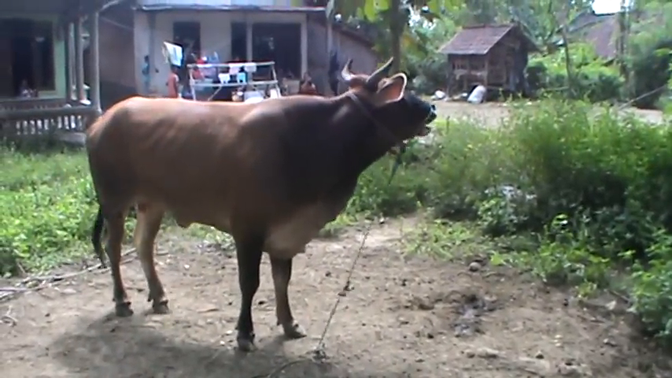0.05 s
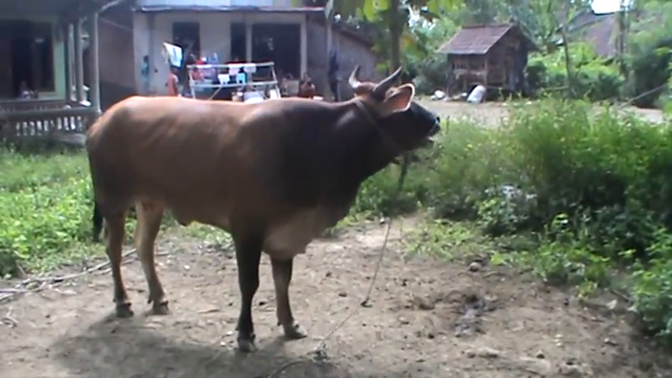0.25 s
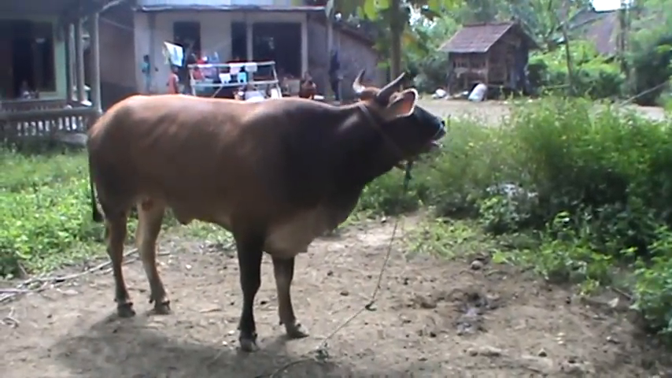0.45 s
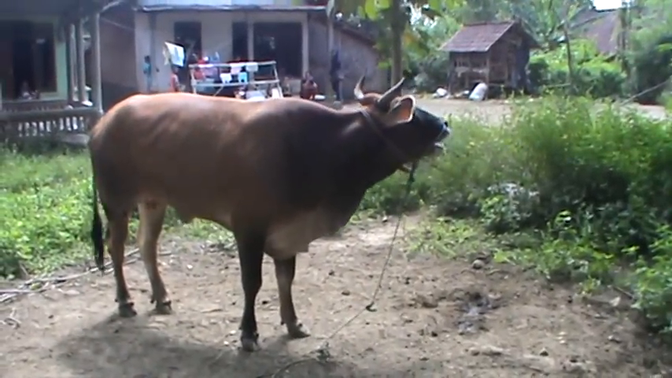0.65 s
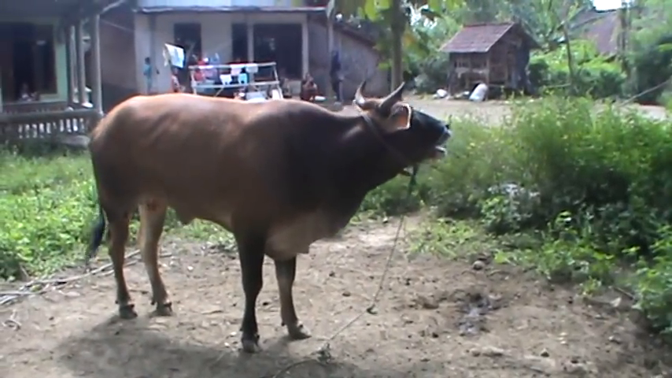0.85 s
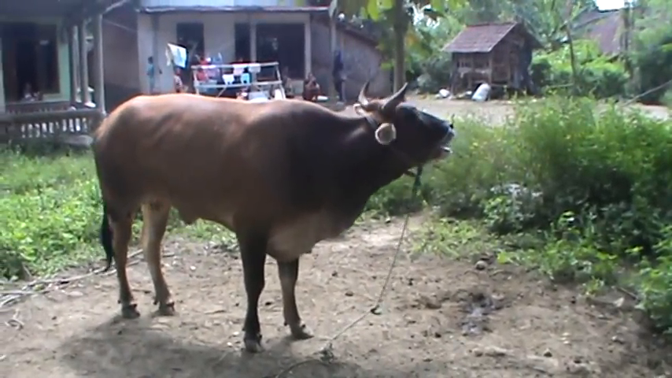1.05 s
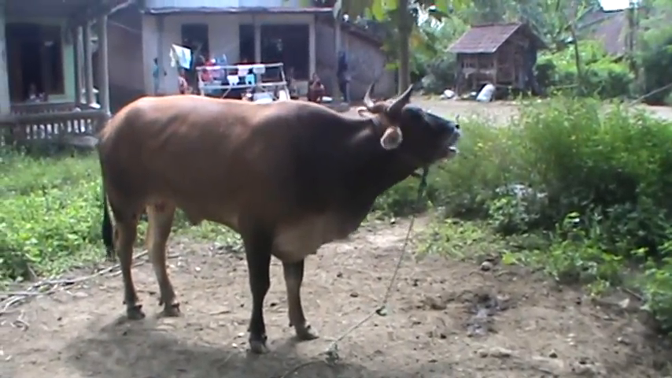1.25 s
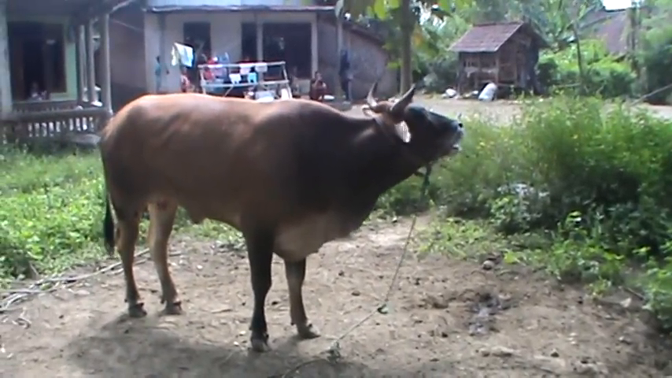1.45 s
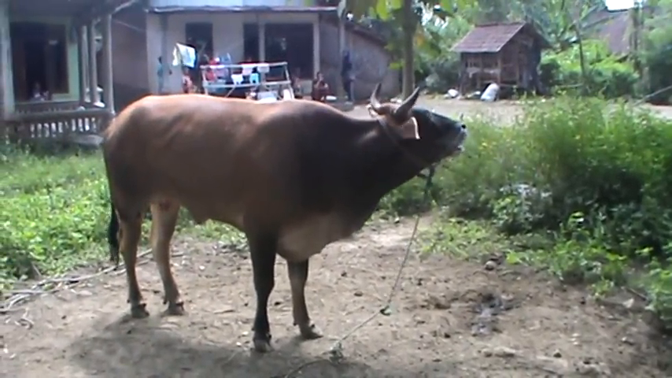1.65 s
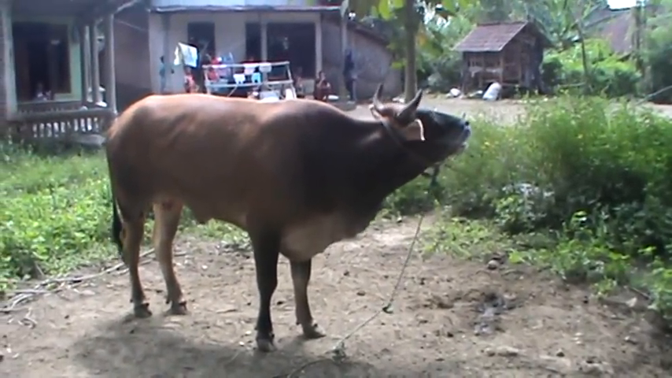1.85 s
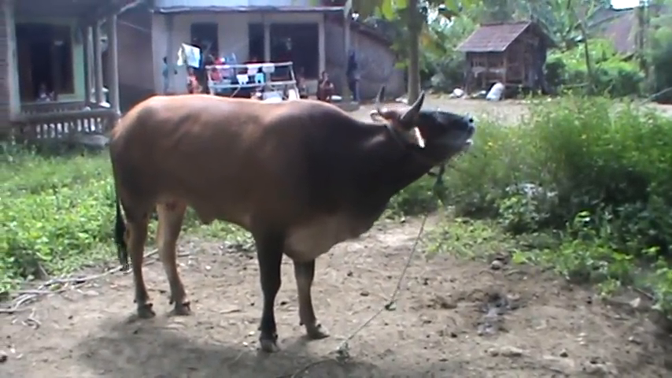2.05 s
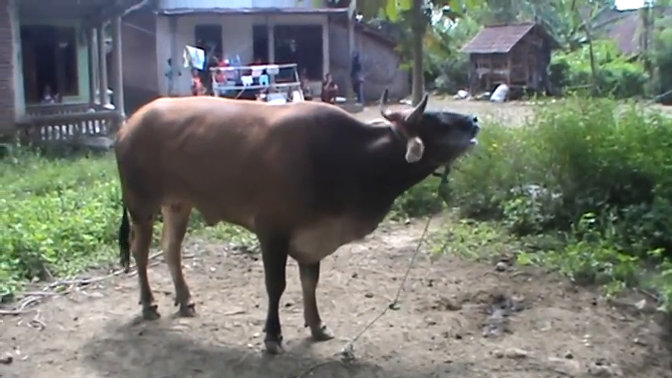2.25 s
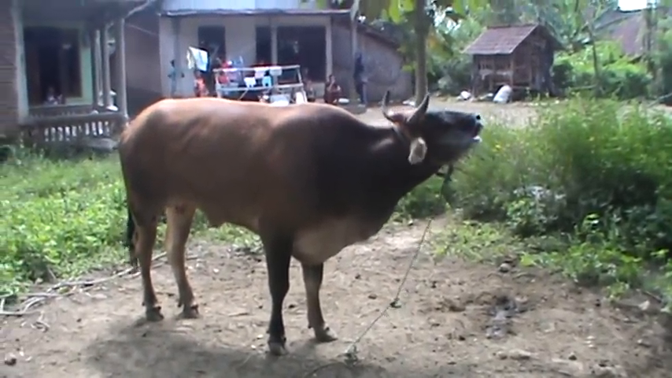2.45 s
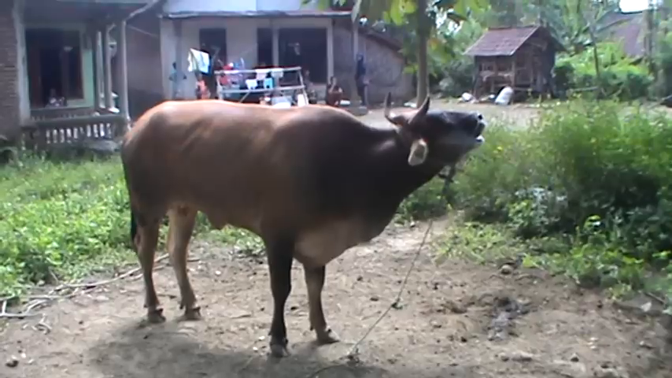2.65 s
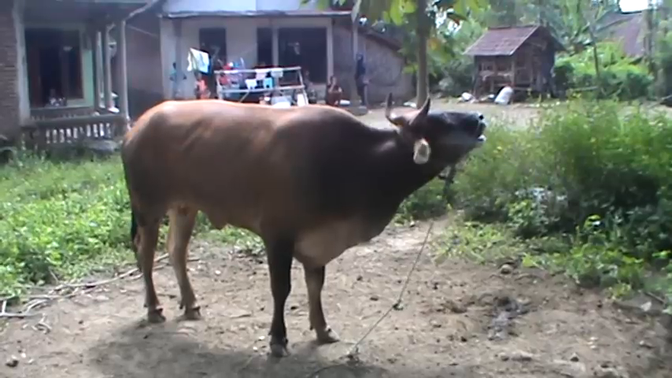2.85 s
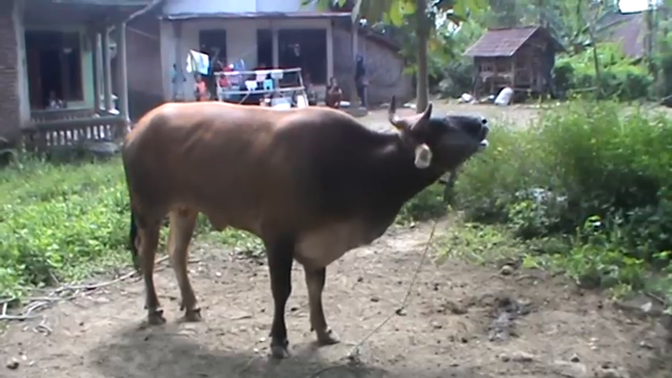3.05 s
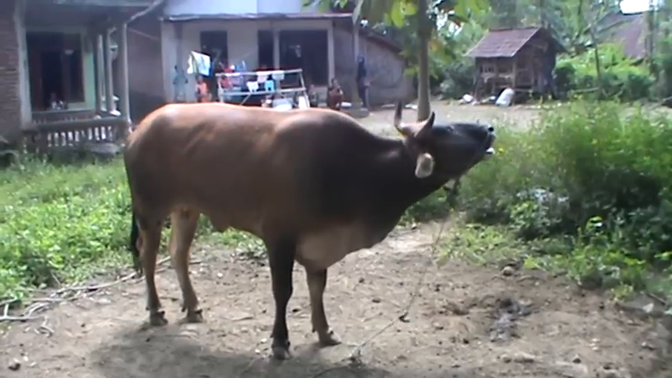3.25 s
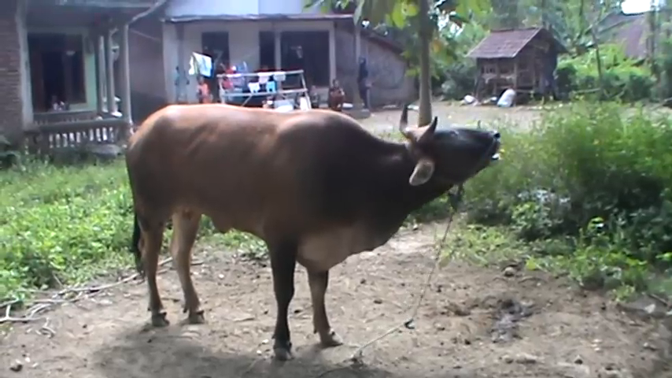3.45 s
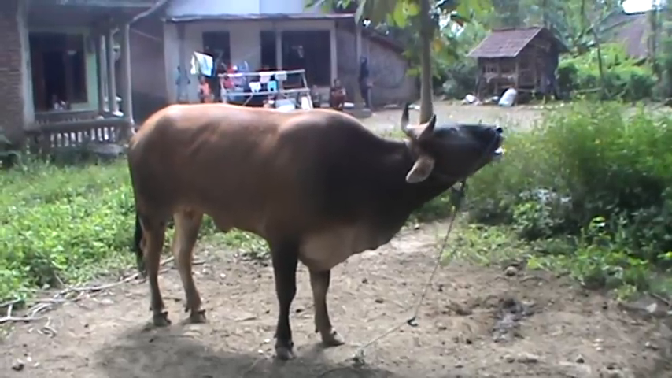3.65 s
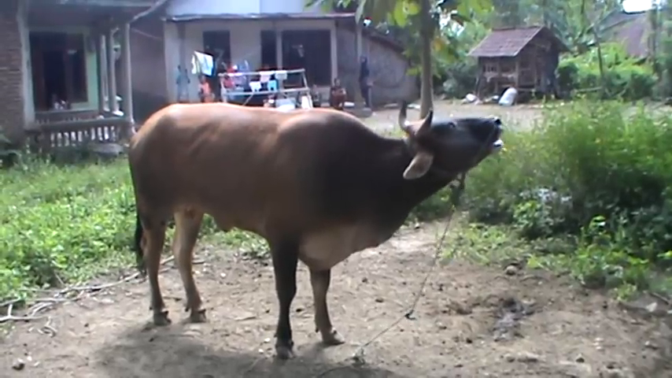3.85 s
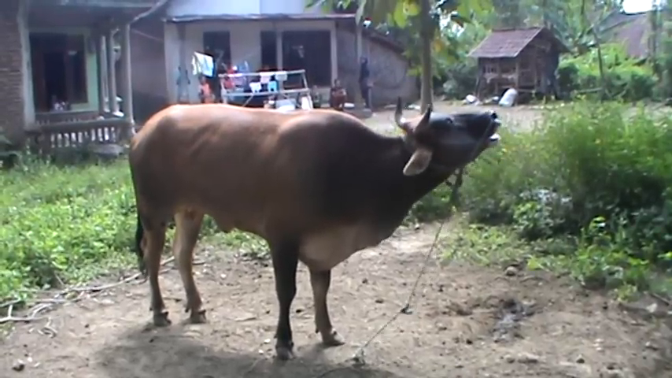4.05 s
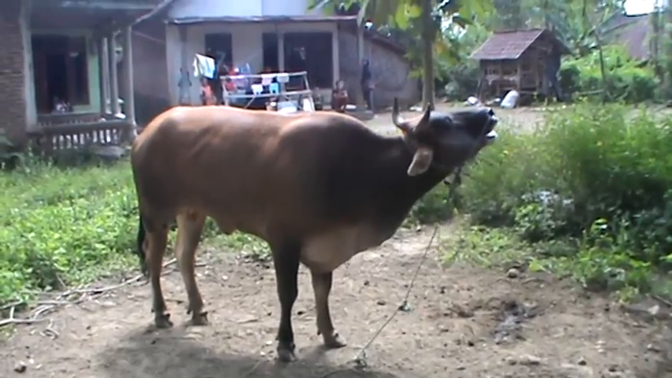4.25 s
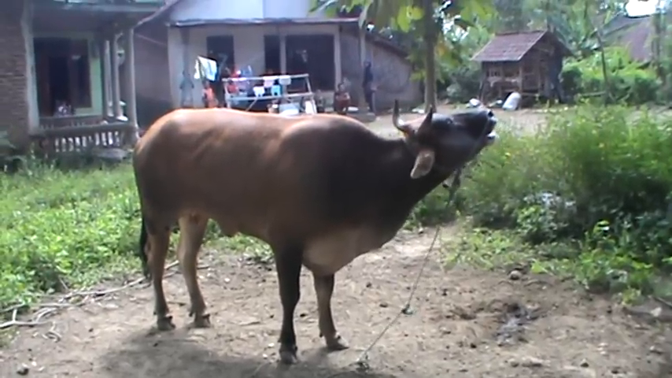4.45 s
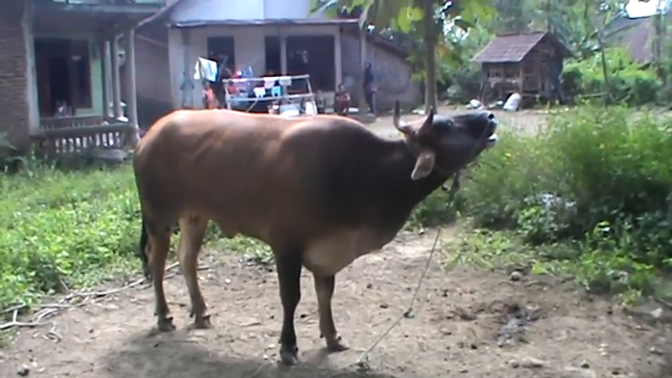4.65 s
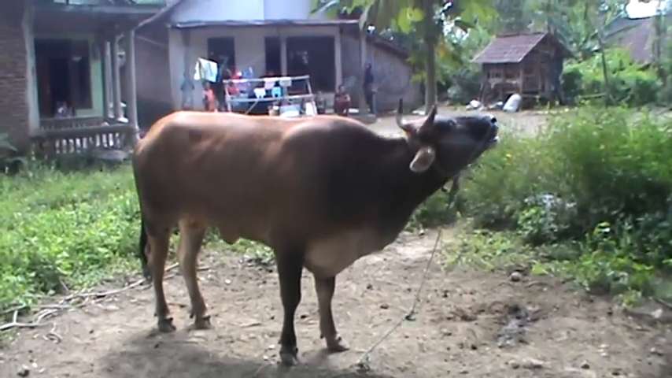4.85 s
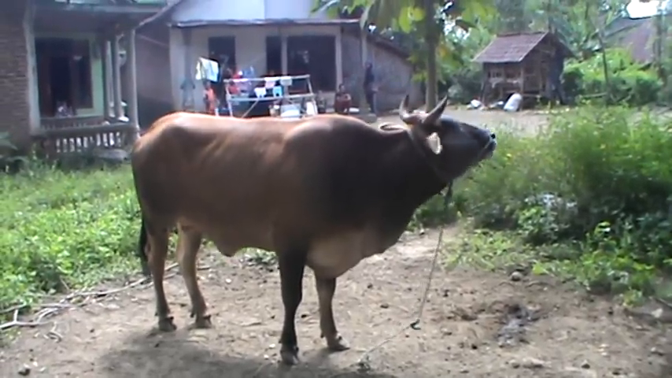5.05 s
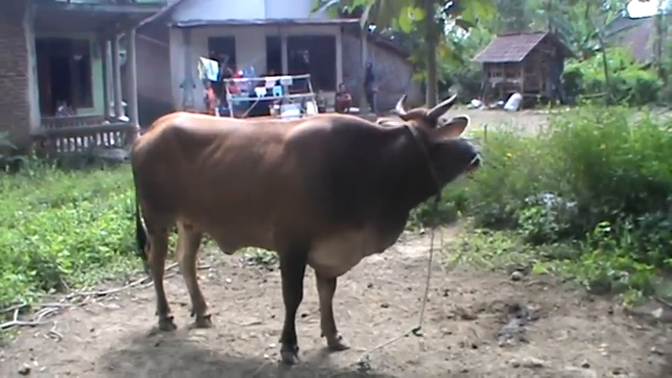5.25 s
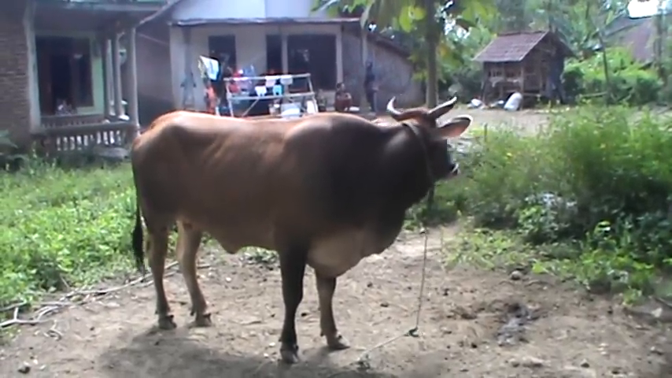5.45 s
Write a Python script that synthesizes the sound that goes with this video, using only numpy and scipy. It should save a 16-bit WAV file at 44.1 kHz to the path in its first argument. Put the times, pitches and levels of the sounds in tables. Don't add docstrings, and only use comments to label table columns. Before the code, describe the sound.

A few metres from a small stereo camera, a cow is already bellowing: a tight, high, nasal cry that breaks into roughness, drops to a low moo, cracks harshly again, then wavers low and ends abruptly. Leaves stir softly, a distant bird rasps in fast clicks, and the camera motor whines thinly. A tiny dry tick follows the call.

```python
import sys
import numpy as np
from scipy import signal
from scipy.fft import rfft, irfft, next_fast_len
from scipy.io import wavfile
from scipy.ndimage import uniform_filter1d, minimum_filter1d, map_coordinates

SR = 44100
rng = np.random.default_rng(int(sys.argv[2]) if len(sys.argv) > 2 else 0)


def dump_mix(stems):
    frames = np.atleast_2d(stems).T
    limited = np.clip(frames, -1, 1)
    pcm = np.round(limited * 32767).astype(np.int16)
    wavfile.write(sys.argv[1], SR, pcm)


def elevation(decibels):
    levels = np.asarray(decibels, float)
    return 10 ** (levels / 20)


N = 243285
T = np.arange(N) / SR

# start in seconds, whistle lock 0 to 1, chaos share 0 to 1.
FOLD_STATES = [(0, .35, .3), (.06, .7, .3), (.115, 1, .012), (.397, 1, .35), (.75, 1, .92), (.83, 1, .45),
               (1.212, 1, .03), (1.325, .6, .6), (1.43, 0, .1), (1.62, 0, .01), (2.12, 0, .035),
               (2.21, 0, .15), (2.25, 1, .7), (2.285, 1, .996), (2.555, 1, .7), (2.667, 1, .99),
               (2.7, 1, .75), (2.735, 0, .35), (2.78, 0, .1), (2.84, 0, .008), (3.79, 0, .2),
               (3.88, 0, .015), (4.23, 0, .3), (4.33, 0, .12), (4.39, 0, .22), (4.53, 0, .7), (4.62, 0, .3),
               (4.72, 0, .42)]
# time in seconds, pitch in Hz.
MOO_PITCH = [(1.33, 179.3), (1.61, 130.4), (1.77, 124.1), (1.93, 126.4), (2.23, 145.7), (2.75, 127),
             (2.92, 124.7), (3.11, 124.7), (3.3, 131.1), (3.57, 124.2), (3.81, 120.3), (3.96, 99.2),
             (4.11, 96.8), (4.24, 110), (4.41, 147.6), (4.53, 145.4), (4.7, 112.5), (4.83, 68.25)]
# time in seconds, effort in dB, strain of the larynx about -1.5 to 1.5.
EFFORT = [(0, -1, 0.89), (.13, -4.5, 1.1), (.38, -2.5, 0.77), (.44, -3, 1.3), (1.4, -4, 0.63),
          (1.54, -0.5, -1.1), (1.62, -0.5, -1.1), (2.02, 0.5, -0.95), (2.2, -1.5, 0.33), (2.7, 7, -0.77),
          (2.9, 0.5, -1.43), (3.6, -5, 0.61), (3.83, -2, 0.37), (4.12, -2, -1.16), (4.29, 0.5, -0.15),
          (4.36, -1, -0.2), (4.44, -1.5, -0.33), (4.75, 3.5, -0.75)]
# time in seconds, opening -1 to 1, tongue resonance in Hz, lip resonance in Hz.
MOUTH_SHAPE = [(0, -0.077, 764, 1376), (.13, .5, 1060, 1565), (1.35, .5, 955, 1640),
               (1.52, 0.81, 920, 1450), (1.8, .3, 1023, 1963), (2.05, 0.46, 977, 1943),
               (2.22, 0.25, 880, 1790), (2.6, 0.14, 930, 1600), (2.9, -0.35, 870, 1864),
               (3.14, -0.49, 863, 1850), (3.3, 0.44, 903, 1667), (3.46, 0.026, 889, 1827),
               (3.76, -0.34, 1013, 1873), (3.9, -0.084, 910, 1595), (4.12, -0.44, 923, 1625),
               (4.38, -0.43, 833, 1430), (4.58, -0.13, 867, 1600), (4.75, -0.25, 948, 1650)]
# start in seconds, end in seconds, depth.
DOUBLING = (4.41, 4.565, 1.3)
# centre in Hz, width in Hz, level in dB.
CHEST = [(256.7, 62, 0), (262, 81, -6.5)]
# centre in Hz, width in Hz, level in dB.
THROAT = [(443, 230, -29), (449, 100, -3.5), (528.9, 69.3, 20.5), (583, 20, -33.5)]
# centre in Hz, width in Hz, level in dB.
MOUTH = [(819, 110.6, 11.4), (902.8, 73.5, 11), (1026.2, 78.4, 16.1)]
# centre in Hz, width in Hz, level in dB.
LIPS = [(1305, 270, 7.2), (1430, 74, 9.7), (1639.7, 101, 10.14), (1836, 74, 8), (1990, 86, 6.5)]
# centre in Hz, width in Hz, level in dB.
SKULL = [(2366, 120, 6.5), (2707, 170, 1), (3226, 290, 1), (3690, 210, -3.5), (4490, 300, 1.5),
         (5380, 350, -10), (8100, 530, -20), (11000, 1200, -23)]
# frequency in Hz, lead in radians.
LEFT_LEAD = [(60, .15), (125, 0.067), (250, 0.66), (500, 1.06), (700, 1.31), (1000, 1.17), (2000, 0.99),
             (5000, 0.55), (10000, 0.09)]
# frequency in Hz, left over right in dB.
LEFT_TILT = [(60, -0.5), (180, -0.5), (550, 0), (1650, -2.5), (4970, -4), (15000, -6.5)]
# delay at left in seconds, delay at right in seconds, level in dB.
GROUND_ECHOES = [(.0031, 0.0056, -26), (.0074, 0.007, -21)]
# frequency in Hz, time to fall 60 dB in seconds.
WALL_DECAY = [(200, 0.93), (1000, 0.51), (4000, 0.3), (9000, 0.1)]
# time into the cycle in seconds, 80th shaft order in Hz.
MOTOR_HUNT = [(0, 13452), (.22, 13520), (.97, 13606), (2, 13452)]
# shaft order, level in dB beside the 80th.
HIGH_ORDERS = [(76, -7.5), (78, -8.5), (79, -10), (81, -27), (82, -8.5), (84, -23.5)]
# shaft order, level in dB.
LOW_ORDERS = [(18, -31), (20, 3.5), (21, -28.5), (22, -10.5), (26, -35.5), (40, -9.5), (60, -22)]
# frequency in Hz, level in dB per Hz.
YARD_COLOUR = [(15, -56.5), (25, -17.5), (259, -5.5), (319, -2.5), (470, -13.5), (694, -8), (1170, -16.5),
               (2900, -20), (3300, -18), (3960, -20), (11500, -28.5), (12400, -24.5), (16100, -57.5),
               (22000, -120)]
# frequency in Hz, likeness -1 to 1.
YARD_LIKENESS = [(60, 0.32), (180, -0.45), (550, 0.41), (1650, 1), (4970, 0.39), (15000, 0.23)]
# time in seconds, level in dB.
BREEZE = [
    (0, 0),
    (2.6, 0),
    (3.0, -2.5),
    (3.6, 2),
    (4.6, 7),
    (5.0, -4.5),
    (5.52, -4),
]
# start in seconds, peak in dB, centre in Hz.
RASPS = [(1.714, -44, 6700), (1.926, -43, 6930), (2.0816, -44, 6950), (2.19, -38, 6800),
         (2.3534, -39.5, 7260), (3.8097, -36, 6300), (4.0347, -34.5, 6840), (4.207, -32.5, 6980),
         (4.351, -31.5, 7050), (4.4686, -31.5, 6870), (4.6263, -32.5, 6900), (4.7353, -28, 6830),
         (4.8449, -29.5, 6660)]
# start in seconds, peak in dB.
TICKS = [
    (4.3823, -30),
    (5.4932, -34),
]


def unit(x):
    return x / np.sqrt(np.mean(x ** 2) + 1e-20)


def smooth(x, s):
    return uniform_filter1d(x, size=int(s * SR) + 1)


def along(points, hz):
    f, v = np.transpose(points)
    return np.interp(np.log(hz + 1), np.log(f + 1), v)


def curves(rows):
    s, *cols = np.transpose(rows)
    return [np.interp(T, s, c) for c in cols]


def wobble(rate):
    knots = rng.standard_normal(int(N * rate / SR) + 4)
    return map_coordinates(knots, [T * rate])


def filtered(x, response):
    m = next_fast_len(N + SR // 2)
    return irfft(rfft(x, m) * response(np.fft.rfftfreq(m, 1 / SR)), m)[..., :N]


def ring(f, hz, width):
    return 1j * f * width / (hz * hz - f * f + 1j * f * width)


def folds(pitch, lock, chaos):
    jitter = .0012 * wobble(40) * (1 + 14 * chaos)
    phase = 2 * np.pi * np.cumsum(pitch * (1 + jitter)) / SR

    def overtone(k):
        return elevation(-3 * np.log2(k)) * np.cos(k * phase - .02 * k * k)

    comb = (1 - lock) * sum(overtone(k) for k in range(1, 44) if k % 3)
    thirds = (1 - lock * chaos) ** 2 * sum(overtone(k) for k in range(6, 70, 3))
    comb = comb + elevation(1.78 * lock) * overtone(3) + elevation(1 * lock) * thirds

    cycles = np.cumsum(3 * pitch / SR)
    slaps = rng.standard_normal((int(cycles[-1]), 3))
    at = np.interp(np.arange(len(slaps)) + .45 * slaps[:, 0], cycles, np.arange(N)).astype(int)
    rattle = np.bincount(at, elevation(2 * slaps[:, 1]) * np.sign(slaps[:, 2]), N)
    rattle = elevation(1.48 * wobble(35)) * (unit(rattle) + 1.6 * rng.standard_normal(N))
    comb = comb * elevation(.4 * wobble(20))
    return np.sqrt(1 - chaos) * comb, np.sqrt(chaos) * unit(rattle), lock * thirds, phase


def cavity(x, modes, focus_hz=None, sharp_db=0):
    def responses(f):
        return np.array([elevation(db) * ring(f, hz, 1.27 * w) ** 2 for hz, w, db in modes])

    parts = filtered(x, responses)
    if focus_hz is not None:
        octaves = np.reshape([np.abs(np.log2(focus_hz / hz)) for hz, w, db in modes], (len(modes), -1))
        parts = parts * elevation(-sharp_db * (octaves - octaves.min(axis=0)))
    return unit(parts.sum(axis=0))


def cow():
    switch_s, glide_s = .025, 0.045
    start, *state = np.transpose(FOLD_STATES)
    now = np.searchsorted(start, T, side="right") - 1
    lock, chaos = [np.clip(smooth(c[now], switch_s), 0, 1) for c in state]

    whistle_hz = 182.1 - 27.82 * np.exp(-T / .085) - 9 * chaos ** 2
    moo_hz = smooth(curves(MOO_PITCH)[0], glide_s)
    relocked_hz = moo_hz + (T > MOO_PITCH[1][0]) * lock * (whistle_hz - moo_hz)
    pitch = np.where(T < MOO_PITCH[0][0], whistle_hz, relocked_hz)

    effort_db, strain = curves(EFFORT)
    opening, tongue_hz, lips_hz = curves(MOUTH_SHAPE)

    def gain(db, db_per_opening, db_per_strain):
        return elevation(db + db_per_opening * opening + db_per_strain * strain)

    comb, rattle, whistle, phase = folds(pitch, lock, chaos)
    chest = gain(-25, -15, 4) * cavity(comb + 1.3 * rattle, CHEST)

    from_s, to_s, depth = DOUBLING
    doubled = smooth(1. * (T > from_s) * (T < to_s), switch_s)
    comb = comb * (1 + depth * doubled * np.cos(phase / 2))

    bursts = elevation(5 * chaos * wobble(28))
    falter = elevation(-1.5 * lock * chaos ** 4)
    throat = gain(-18.5, 6, 4) * falter * cavity(comb + 1.86 * bursts * rattle, THROAT)

    rattle = rattle * np.sqrt(np.minimum(1, .33 / chaos))
    tongue_db = 16.8 * (2.5 - chaos)
    mouth = gain(-22, 2.5, 2) * cavity(comb + 3.42 * rattle, MOUTH, tongue_hz, tongue_db)

    whistle = (1 - chaos) ** 4 * whistle * elevation(-8 * T)
    at_lips = comb + 0.65 * whistle + 2.83 * rattle
    lips = gain(-31.5, 3.5, 6) * cavity(at_lips, LIPS, lips_hz, 45 * (1 - chaos) ** 2)

    hard = 0.56 * comb + 0.32 * whistle + 1.7 * rattle
    skull = gain(-47.5, -6, 10) * cavity(hard, SKULL, 2500, 19 * (1 - lock))

    hum_db = -45 - 9.6 * np.log2(pitch / 115)
    hum = elevation(hum_db) * (1 - lock * (.95 - 0.93 * chaos)) * np.sin(phase)
    chest_floor = signal.butter(8, 233, "highpass", fs=SR, output="sos")
    voice = signal.sosfilt(chest_floor, throat - chest - mouth + lips)

    def breath(release_s):
        return np.clip((4.825 - T) / release_s, 0, 1)

    return breath(.085) ** 2 * elevation(effort_db) * (voice + skull) + breath(.03) * hum


def ports(x):
    side = np.array([[.5], [-.5]])

    def response(hz):
        level = elevation(side * along(LEFT_TILT, hz) + 3.0)
        lead = np.exp(1j * side * along(LEFT_LEAD, hz))
        echoes = 1 + sum(elevation(db) * np.exp(-2j * np.pi * hz * np.array([[left], [right]]))
                         for left, right, db in GROUND_ECHOES)
        dip = 1 - np.array([[.9], [.65]]) * ring(hz, 1146, 290)
        return level * lead * echoes * dip

    return filtered(x, response)


def walls(x):
    hz, t, z = signal.stft(rng.standard_normal((2, SR // 2)), SR, nperseg=256)
    decay = elevation(-60 * t / along(WALL_DECAY, hz)[:, None])
    tail = signal.istft(z * decay, SR, nperseg=256)[1]
    return signal.fftconvolve(x, tail / np.linalg.norm(tail[0]), axes=1)[:, :N]


def drive():
    rise_db = 1.29 * T
    fades = wobble(9) ** 2 + wobble(9) ** 2
    whine_db = -53 + rise_db + 10 * np.log10(fades + .01)
    hum_db = -60 + rise_db + 1.5 * wobble(15)

    hunt_start_s, hunt_cycle_s = 1.885, 2.0
    whine_hz = np.interp((T - hunt_start_s) % hunt_cycle_s, *np.transpose(MOTOR_HUNT))
    turn = 2 * np.pi * np.cumsum(uniform_filter1d(whine_hz, size=3000)) / SR / 80

    def orders(table):
        return sum(elevation(db + 2.3 * wobble(16.0)) * np.sin(k * turn + k * k) for k, db in table)

    sidebands = elevation(-53) * orders(HIGH_ORDERS)
    hiss = rng.standard_normal((2, N))
    whirr = elevation(-59) * unit(filtered(hiss, lambda f: ring(f, 13450, 1100) ** 2))
    whine = elevation(whine_db + 3 + 2.5 * wobble(14)) * np.sin(80 * turn + [[-.2], [.2]])
    high = whine + sidebands + whirr
    low = elevation(hum_db + 4.0) * orders(LOW_ORDERS)
    scan = elevation(-65 + 2.5 * wobble(20)) * np.sin(2 * np.pi * 15625 * T)
    return high * elevation([[-.7], [.7]]) + np.array([low, np.roll(low, 4)]) + scan


def yard():
    z = signal.stft(rng.standard_normal((2, N)), nperseg=512)[2]
    patches = uniform_filter1d(rng.standard_normal(z.shape[1:]), size=6, axis=0)
    patches = uniform_filter1d(patches, size=14, axis=1)
    pair = signal.istft(z * elevation(1.0 * unit(patches)), nperseg=512)[1][:, :N]

    def mid_side(hz):
        angle = np.arccos(np.clip(along(YARD_LIKENESS, hz), -1, 1)) / 2
        return elevation(along(YARD_COLOUR, hz)) * [np.cos(angle), np.sin(angle)]

    mid, side = filtered(pair, mid_side)
    level_db = -46.5 + curves(BREEZE)[0] + 0.35 * wobble(3.3)
    return elevation(level_db) * unit(np.array([mid + side, mid - side]))


def bird():
    out, t = np.zeros(N + SR), T[:SR // 4]
    for s, db, hz in RASPS:
        pulses = 0.34 + np.sin(np.pi * 190 * t) ** 4
        clicks = rng.standard_normal(len(t)) * pulses * elevation(3.1 * rng.standard_normal(len(t)))
        b, a = signal.butter(3, [hz - 700, hz + 650], "bandpass", fs=SR)
        trail = .35 * elevation(-60 * t / .6)
        swell = np.clip(t / .008, 0, 1) * (np.clip((.07 - t) / .04, 0, 1) + trail)
        out[round(s * SR):][:len(t)] += elevation(db - 15) * swell * unit(signal.lfilter(b, a, clicks))
    return elevation([[1.3], [-1.3]]) * out[:N]


def ticks():
    out, t = np.zeros(N + SR), T[:SR // 50]
    for s, db in TICKS:
        crack = uniform_filter1d(np.diff(rng.standard_normal(len(t) + 1)), size=3)
        out[round(s * SR):][:len(t)] += elevation(db - 8.5 - 60 * t / .012) * crack
    return out[:N]


def scene():
    voice, rasps = cow(), bird()
    far = elevation(-19) * walls(voice[None]) + elevation(-10) * walls(rasps)
    return ports(voice) + far + rasps + ticks() + drive() + yard()


def roll_off(x):
    return signal.sosfilt(signal.butter(12, 15670, fs=SR, output="sos"), x)


def record(dry):
    limit_db, grip, hold_s, ease_s = -6.5, 0.61, 0.006, 0.0072
    peak = np.abs(dry).max(axis=0) + 1e-9
    need = np.minimum(1, elevation(limit_db) / peak) ** grip
    held = minimum_filter1d(need, size=int(hold_s * SR) + 1)
    mix = dry * smooth(held, ease_s)
    return roll_off(mix)


dry = scene()
out = record(dry)
dump_mix(out)
```